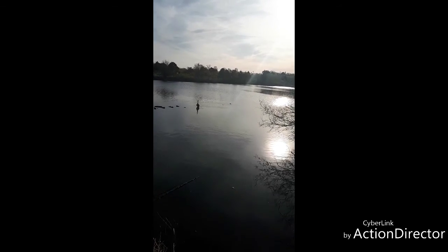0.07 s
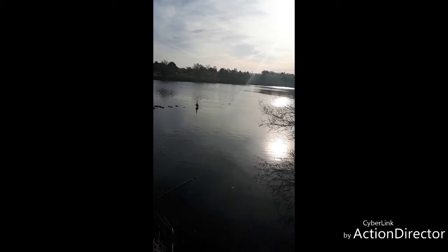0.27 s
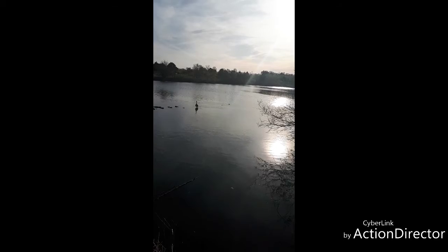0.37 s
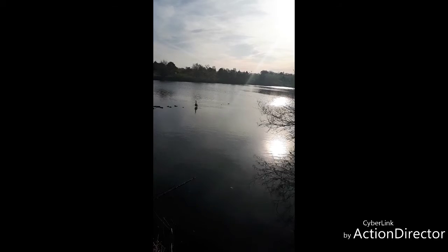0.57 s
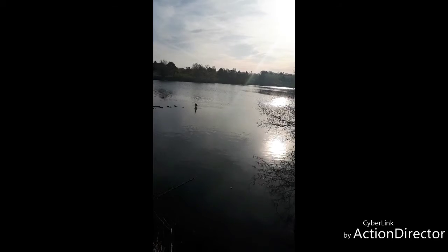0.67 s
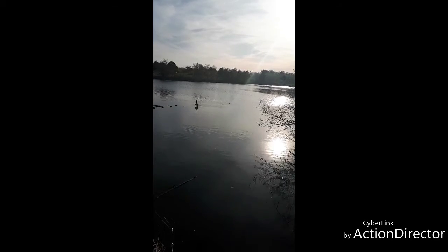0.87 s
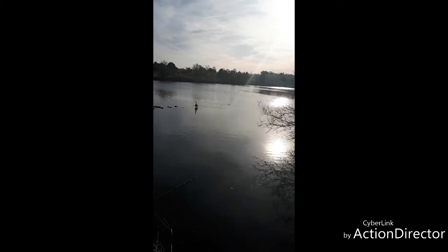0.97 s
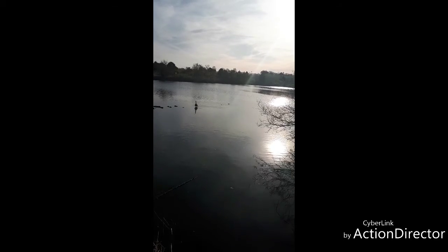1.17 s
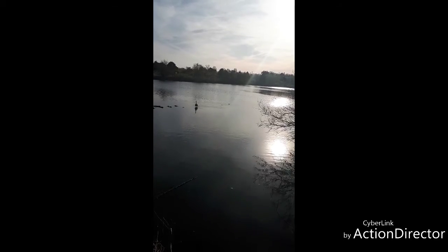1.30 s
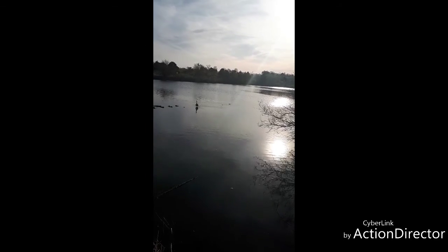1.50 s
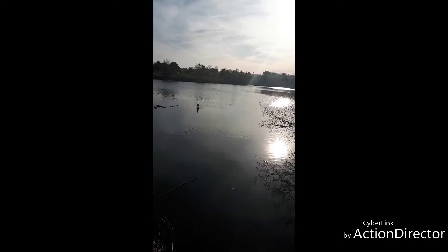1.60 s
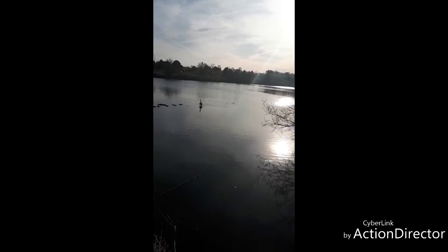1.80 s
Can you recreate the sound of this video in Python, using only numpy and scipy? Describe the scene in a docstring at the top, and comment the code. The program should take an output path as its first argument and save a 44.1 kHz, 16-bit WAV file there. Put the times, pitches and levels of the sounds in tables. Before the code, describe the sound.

Two geese honk in turn on a quiet lake: a lower voice, a brighter one, then the lower again. Each short, brassy honk echoes off the wooded shore, over low wind rumble and a faint hum.

```python
"""Two geese call in turn across a still lake: the lower voice twice, the brighter one in between.
Each call is a train of pulses from the voice box, ringing in the throat. It starts as a rising grunt,
cracks through a middle pitch and jumps to a short brassy honk with the bill wide open.
The wooded shore sends the honks back. Faint echoes of the bright goose's earlier honk open the scene,
one distant call comes near the end, and low wind rumble with a faint steady hum lies under it all."""
import sys
import numpy as np
from scipy import signal
from scipy.fft import rfft, irfft
from scipy.io import wavfile
from scipy.ndimage import uniform_filter1d

SR = 44100
rng = np.random.default_rng(int(sys.argv[2]) if len(sys.argv) > 2 else 0)


def master(y):
    """Save y as 16-bit WAV."""
    cut = np.clip(np.atleast_2d(y).T, -1, 1)
    pcm = np.round(cut * 32767)  # scale
    wavfile.write(sys.argv[1], SR, pcm.astype(np.int16))


N = 81585
TREBLE_LIMIT_HZ = 15600


def amp(db):
    """Turns decibels into a number to multiply by."""
    return 10 ** (np.asarray(db) / 20)


def unit(x):
    """Scales a signal to an average strength (rms) of 1."""
    return x / np.sqrt(np.mean(x ** 2) + 1e-20)


def look_up(table, hz, column=1):
    """Reads a column between the rows of a table, spacing frequencies by octaves."""
    columns = np.transpose(table)
    return np.interp(np.log(hz + 1), np.log(columns[0] + 1), columns[column])


def follow(curve):
    """Gives the sample times of a curve, then each of its columns at those times."""
    times, *columns = np.transpose(curve)
    t = np.arange(times[0], times[-1], 1 / SR)
    return [t] + [np.interp(t, times, column) for column in columns]


def add(mix, t, sound, fade_s=0.0032):
    """Mixes in a sound at its times, with soft ends."""
    sound = sound * np.clip(np.minimum(t - t[0], t[-1] - t) / fade_s, 0, 1)
    at = round(t[0] * SR) + np.arange(len(t))
    inside = (at >= 0) & (at < N)
    mix[at[inside]] += sound[inside]


def wander(t, size=60):
    """Smooth random drift; a larger size drifts more slowly."""
    return unit(uniform_filter1d(uniform_filter1d(rng.standard_normal(N), size), size))[:len(t)]


def wind_and_hum(level_db=-39.5, patch_db=2):
    """Low wind rumble with drifting louder patches and a faint steady distant hum."""
    # wind rumble, with the hum as peaks at 228 and 277 Hz: frequency_hz, relative_db
    rumble = [(20, -40), (48, -21.5), (65, -6), (120, 1.5), (185, -6), (228, 0.5), (252, -4.5), (277, 1),
              (310, -7), (360, -10), (520, -11), (800, -18.5), (1500, -23), (1900, -36.5), (3200, -50),
              (15000, -58.5)]
    # how alike left and right are: frequency_hz, likeness (1 = the same)
    likeness = [(30, .8), (70, 0.98), (170, 1), (280, 0.72), (900, 0.62), (1500, 0.079)]
    hz = np.fft.rfftfreq(4096, 1 / SR)
    a, b, c, d, patches = rng.standard_normal((N // 1024 + 5, len(hz), 5)).T
    patches = unit(uniform_filter1d(uniform_filter1d(patches, size=10, axis=0), size=4, axis=1))
    same = np.clip(look_up(likeness, hz), -1, 1)[:, None]
    left = a + 1j * b
    right = same * left + np.sqrt(1 - same ** 2) * (c + 1j * d)
    spectrum = np.array([left, right]) * amp(look_up(rumble, hz)[:, None] + patch_db * patches)
    return amp(level_db) * unit(signal.istft(spectrum, nperseg=4096, noverlap=3072)[1][:, :N])


def shore(calls, build_s=0.028, echo_band_hz=(1160, 2030)):
    """The bank returns two dull echoes and the trees scatter the calls into a fading tail."""
    # tail from the trees: frequency_hz, fade_s (time to fall 60 dB), level_db
    trees = [(729, 0.68, -20), (1500, 0.67, -11), (2300, 0.61, -19), (4500, 0.33, -18.5), (8000, 0.32, -19),
             (15000, 0.31, -19)]
    # echoes from the bank: delay_s, level_db
    bank = [(.04, -25.5), (.088, -16.5)]
    hz, t, noise = signal.stft(rng.standard_normal((2, SR)), SR, nperseg=256)
    shape = np.minimum(t / build_s, 1) * amp(-60 * t / look_up(trees, hz)[:, None])
    shape *= (amp(look_up(trees, hz, column=2)) / np.sqrt((shape ** 2).mean(1) * SR))[:, None]
    tail = signal.istft(noise * shape, SR, nperseg=256)[1]
    dull = signal.lfilter(*signal.butter(2, echo_band_hz, "band", fs=SR), calls)
    echoes = sum(amp(db) * np.pad(dull, ((0, 0), (round(s * SR), 0)))[:, :N] for s, db in bank)
    return echoes + signal.fftconvolve(calls, tail, axes=1)[:, :N]


def far_honk(start_s, length_s, pitch_hz, level_db, strong_hz, width_octaves=0.25, jitter=0.01):
    """Distance wears a honk or its echo down to the harmonics (pitch multiples) near strong_hz."""
    t = np.arange(0, length_s, 1 / SR)
    cycles = np.cumsum(pitch_hz * (1 + jitter * wander(t, size=150))) / SR
    harmonic = np.arange(1, 6)[:, None]
    strength = np.exp(-abs(np.log2(harmonic * pitch_hz / strong_hz)) / width_octaves)
    tone = (strength * np.cos(2 * np.pi * harmonic * cycles)).sum(0)
    return start_s + t, amp(level_db) * np.sin(np.pi * t / length_s) * unit(tone)


def to_stereo(sound, voice):
    """A voice reaches the left and right microphones with different strength and timing."""
    # for each voice: frequency_hz, left_minus_right_db, left_lead_rad
    sides = {"low": [(730, 2, 0.35), (1050, -0.5, 0.22), (1250, -6.5, 0.2), (1450, -3.5, 1.86),
             (2260, 15, .1), (3640, 2.5, 0.66), (4400, -4, 1.16), (5180, 4.5, 1.68), (15000, -0.5, 1.9)],
             "bright": [(770, 4.5, 0.5), (1053, -3, 0.87), (1503, -3, 1.5), (3120, 0, 1.52), (4660, 5.5, 1),
             (5540, 5, -0.6), (6100, -5, 3.5), (6970, 7.5, -5.5), (8800, 2, 1.88)]}
    hz = np.fft.rfftfreq(2 * N, 1 / SR)
    left = amp(look_up(sides[voice], hz) / 2) * np.exp(.5j * look_up(sides[voice], hz, column=2))
    pair = np.array([left, 1 / left])
    return irfft(rfft(sound, 2 * N) * pair / np.maximum(abs(pair.mean(0)), .5))[:, :N]


def throat(pulses, tone, size=4096):
    """The throat rings after every pulse, boosting some frequencies and damping others."""
    log_gain = np.log(amp(look_up(tone, abs(np.fft.fftfreq(size, 1 / SR)))))
    ring = np.fft.ifft(np.exp(np.conj(signal.hilbert(log_gain)))).real
    return signal.fftconvolve(pulses, ring[:size // 2])[:len(pulses)]


def voice_box(hz, air, shift_cycles=0, flutter=0.45, full_flutter_hz=6960, blur_rad=0.73):
    """The voice box gives one sharp pulse and one puff of air per cycle."""
    cycles = np.cumsum(hz) / SR + shift_cycles
    harmonic = np.arange(1, int(TREBLE_LIMIT_HZ / hz.mean()) + 1)[:, None]
    # each overtone trembles on its own, the high ones most
    points = rng.standard_normal((160, 128, 2)) @ [1, 1j]
    steps = np.arange(len(hz)) / 512
    tremble = np.array([np.interp(steps, np.arange(len(row)), row) for row in points[:len(harmonic)]])
    depth = flutter * np.sqrt(np.minimum(harmonic * hz.mean() / full_flutter_hz, 1)) * (harmonic > 1)
    puffs = (0.33 + np.exp(-(cycles % 1) / 0.32)) * rng.standard_normal(N)[:len(hz)]
    hiss = signal.lfilter([1, -0.59], 1, puffs)  # leans to the treble
    # harmonics slightly out of step blur each pulse
    lag = blur_rad * rng.standard_normal((160, 1))[:len(harmonic)]
    pulses = ((1 + depth * tremble) * np.exp(2j * np.pi * harmonic * cycles + 1j * lag)).real.sum(0)
    return unit(pulses) + air * unit(hiss)


def closed_call(voice, jump_s, curve, jitter, air, rasp_hz=1150, rasp_growth=0.48):
    """Pulses pass through the nearly shut bill and get raspier with effort."""
    # throat with the bill nearly shut, for each voice: frequency_hz, relative_db
    shut_bill = {"low": [(150, -20), (460, -9.5), (750, -3.5), (900, -2), (1060, 0.5), (1250, 5),
                 (1450, -13), (1750, -37), (2250, -22), (2700, -38), (3600, -43), (4500, -30),
                 (5400, -50.5), (7700, -51), (16000, -76)], "bright": [(150, -34), (480, -3.5), (700, -7.5),
                 (1000, 4.5), (1200, -7.5), (1850, -4), (2500, -19), (3000, -15), (3700, -39.5),
                 (5100, -15.5), (6500, -40.5), (8000, -27), (9500, -65)]}
    t, hz, db = follow(curve)
    pulses = voice_box(hz * (1 + jitter * wander(t)), air)
    sound = unit(throat(pulses, shut_bill[voice]))
    rasp = signal.sosfiltfilt(signal.butter(2, rasp_hz, "high", fs=SR, output="sos"), sound)
    effort = amp(rasp_growth * (db - db.max()))
    return jump_s + t, amp(db) * (sound - rasp + rasp * effort)


def grunt(voice, jump_s):
    """Slow, breathy pulses speed up to open the call."""
    # for each voice: time_from_jump_s, pitch_hz, level_db
    curves = {"low": [(-.3, 128.5, -56.5), (-.26, 136, -42.5), (-.21, 142, -39.5), (-.16, 148, -37.5),
              (-.105, 151.9, -35), (-.053, 153.9, -32.5), (-.025, 165, -32.5), (-.006, 203.5, -29),
              (.011, 211, -44.5)], "bright": [(-.155, 120.4, -63), (-.12, 135.4, -48.5),
              (-.085, 149.7, -45.5), (-.068, 164.7, -38.5), (-.04, 185.2, -41), (-.015, 216.3, -40),
              (.01, 252.3, -38)]}
    # for each voice: pitch_jitter_share, air_share
    roughness = {"low": (.007, 0.56), "bright": (.07, 1.3)}
    return closed_call(voice, jump_s, curves[voice], *roughness[voice])


def crack(voice, jump_s):
    """The voice cracks through a middle pitch on its way to the honk."""
    # for each voice: time_from_jump_s, pitch_hz, level_db
    curves = {"low": [(-.034, 495.6, -41.5), (-.021, 506.3, -31.5), (-.011, 516.7, -25),
              (-.003, 518, -25.5), (.007, 568.5, -38)], "bright": [(-.065, 470.8, -49),
              (-.052, 474.2, -34.5), (-.02, 486, -33), (-.007, 535, -27.5), (.01, 539, -35.5)]}
    return closed_call(voice, jump_s, curves[voice], jitter=0.0036, air=.2)


def honk(voice, curve, top_s, top_hz, climb, sag, settle_s):
    """The pitch arches through the open bill; a second membrane beats against it until it settles."""
    # throat with the bill wide open, for each voice: frequency_hz, relative_db
    open_bill = {"low": [(250, -36.5), (720, 9), (1200, 0.5), (1450, -0.5), (2190, -17), (2900, -21),
                 (3650, -9.5), (4380, -12), (5830, -17), (6560, -27.5), (8000, -29), (9300, -45.5),
                 (11000, -31.5), (13000, -38), (14800, -38.5)], "bright": [(250, -31.5), (770, 7.5),
                 (1200, -4.5), (1540, -8.5), (2320, -4), (3100, -8), (3870, -16.5), (4640, -0.5),
                 (5420, -1.5), (6200, -13.5), (7000, -13), (7750, -10), (8500, -17.5), (9400, -34),
                 (10800, -27), (13500, -29), (15000, -27.5)]}
    # the second membrane, for each voice: beat_hz
    beat_hz = {"low": 211, "bright": 260}
    t, *levels = follow(curve)
    rough = .5 - .5 * np.tanh((t - settle_s) / .01)  # falls from 1 to 0 around settle_s
    arch_hz = top_hz - np.where(t < top_s, climb, sag) * (t - top_s) ** 2  # climb and sag in Hz/s^2
    end_drop_hz = 18 * np.exp((t - t[-1]) / .007)
    hz = (arch_hz - end_drop_hz) * (1 + (0.0036 + 0.014 * rough) * wander(t, size=30))
    beat_cycles = np.cumsum(beat_hz[voice] * (1 + 0.047 * wander(t))) / SR
    beat = (0.027 + 0.57 * rough) * np.cos(2 * np.pi * beat_cycles)
    pulses = (1 + beat) * voice_box(hz, air=0.21 + .3 * rough, shift_cycles=0.063 * beat)
    sound = throat(pulses, open_bill[voice])
    # the first harmonic, the second and the treble each follow their own level
    first, first_two = (signal.sosfiltfilt(signal.butter(6, edge * top_hz, fs=SR, output="sos"), sound)
                        for edge in (1.4, 2.5))
    bands = first, first_two - first, sound - first_two
    return t, sum(amp(db) * unit(band) for db, band in zip(levels, bands))


def scene():
    """Mixes the two geese, the faint echoes, the distant call, the shore, the wind and the hum."""
    # when each call jumps to its honk: voice, jump_s
    jumps = [("low", .423), ("bright", .905), ("low", 1.475)]
    # loudness through each of the three honks: time_s, first_harmonic_db, second_harmonic_db, treble_db
    opening = [(.419, -34, -36.5, -52), (0.426, -23.5, -28, -29), (.44, -26, -33.5, -26),
               (0.461, -26, -31, -35), (0.486, -32.5, -28.5, -32.5), (0.501, -34.5, -28, -51.5),
               (0.513, -40, -43, -64.5)]
    reply = [(.893, -42, -37.5, -49), (.912, -33, -27, -29), (0.946, -32.5, -31.5, -26.5),
             (.963, -39, -29.5, -36), (0.98, -39.5, -35, -47), (.99, -50, -49, -58)]
    closing = [(1.465, -34, -33, -66), (1.477, -26.5, -25, -34), (1.497, -26, -32.5, -28.5),
               (1.517, -26.5, -30, -44), (1.533, -26.5, -39, -38.5), (1.545, -34, -31, -35),
               (1.56, -36, -27.5, -53.5), (1.571, -40.5, -48, -53)]
    # two faint echoes of the bright goose's earlier honk, then one distant call:
    # start_s, length_s, pitch_hz, level_db, strong_hz
    far_sounds = [(-.06, 0.098, 764, -54.5, 1510), (0.115, 0.093, 783, -51, 1530),
                  (1.659, 0.12, 630, -61, 1870)]
    near, far = {"low": np.zeros(N), "bright": np.zeros(N)}, np.zeros(N)
    for voice, jump_s in jumps:
        add(near[voice], *grunt(voice, jump_s))
        add(near[voice], *crack(voice, jump_s))
    low, bright = near["low"], near["bright"]
    add(low, *honk("low", opening, top_s=.458, top_hz=730, climb=8300, sag=24500, settle_s=.4325))
    add(bright, *honk("bright", reply, top_s=.935, top_hz=775, climb=7300, sag=34000, settle_s=.9154))
    add(low, *honk("low", closing, top_s=1.514, top_hz=735, climb=12000, sag=24800, settle_s=1.4825))
    for row in far_sounds:
        add(far, *far_honk(*row))
    geese = to_stereo(low, "low") + to_stereo(bright + far, "bright")
    return geese + shore(geese) + wind_and_hum()


def record(dry):
    """Cuts off the very highest treble."""
    low_pass = signal.firwin(511, TREBLE_LIMIT_HZ, window=("kaiser", 9), fs=SR)
    return signal.oaconvolve(dry, low_pass[None], "same")


dry = scene()
out = record(dry)
master(out)
```